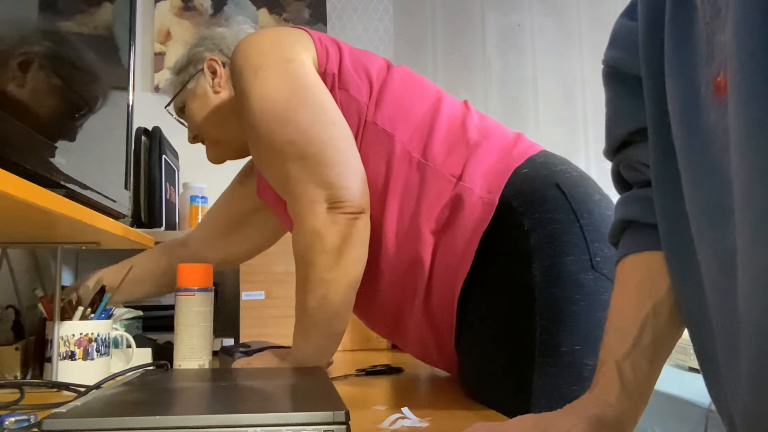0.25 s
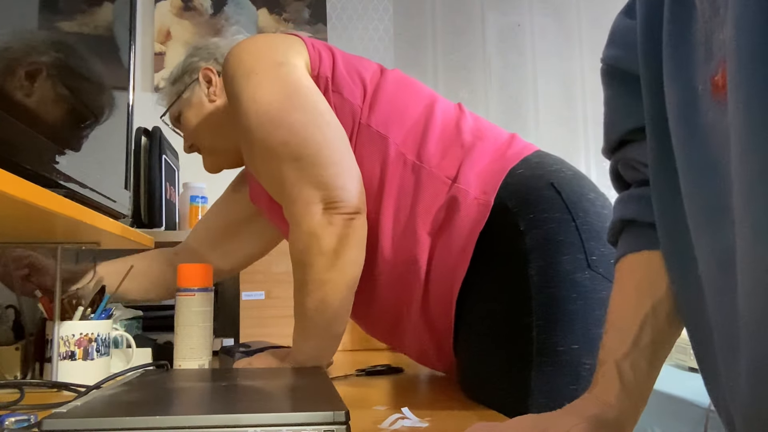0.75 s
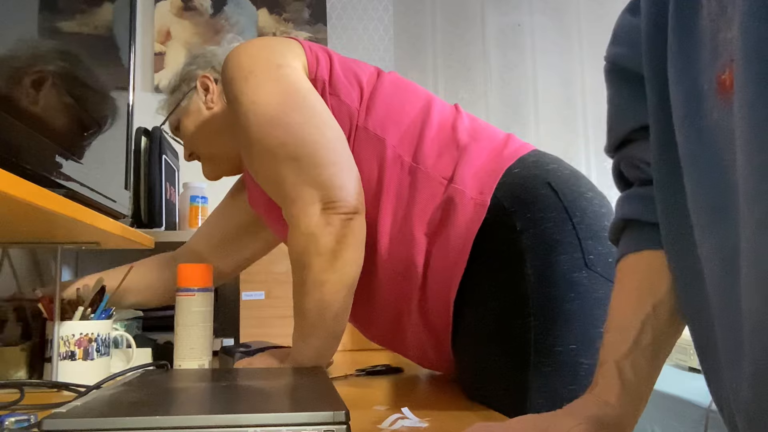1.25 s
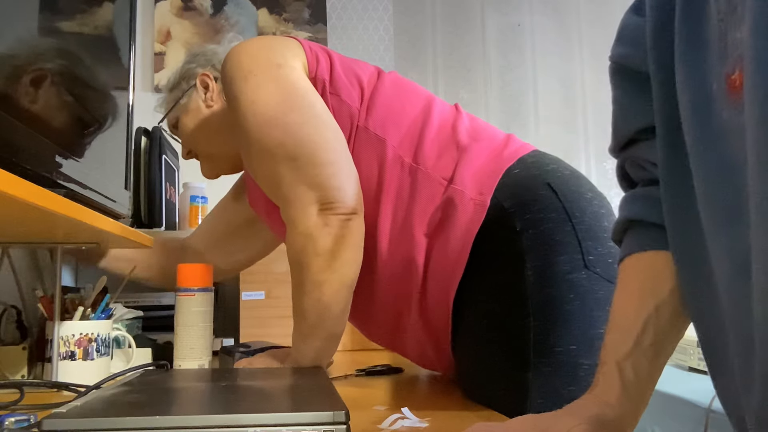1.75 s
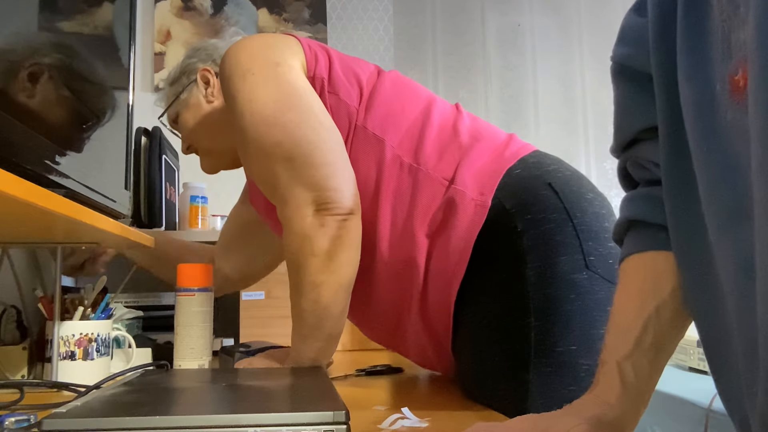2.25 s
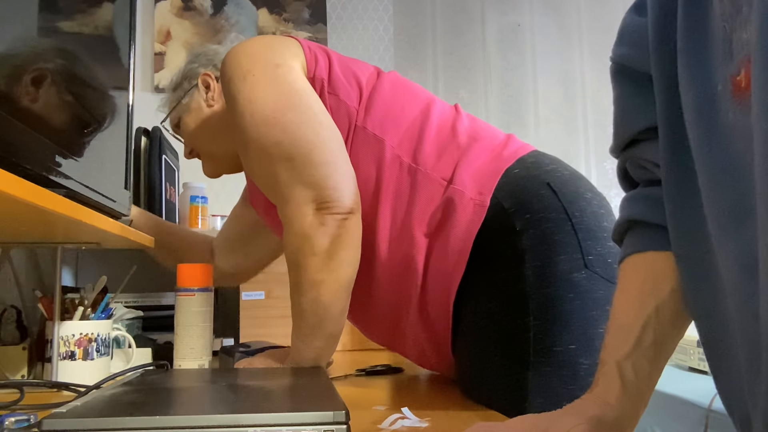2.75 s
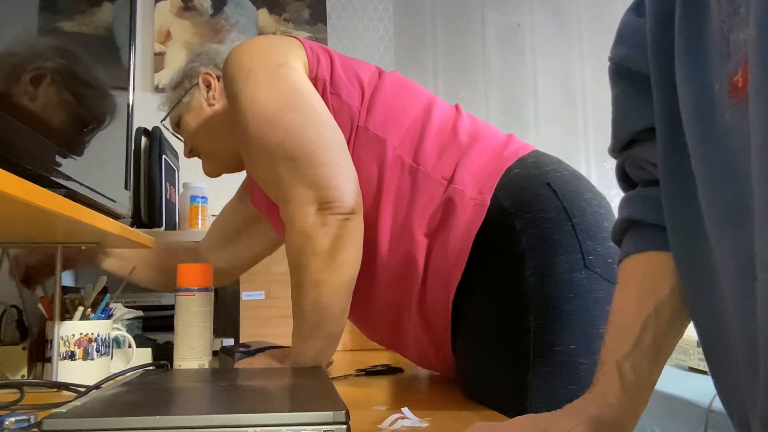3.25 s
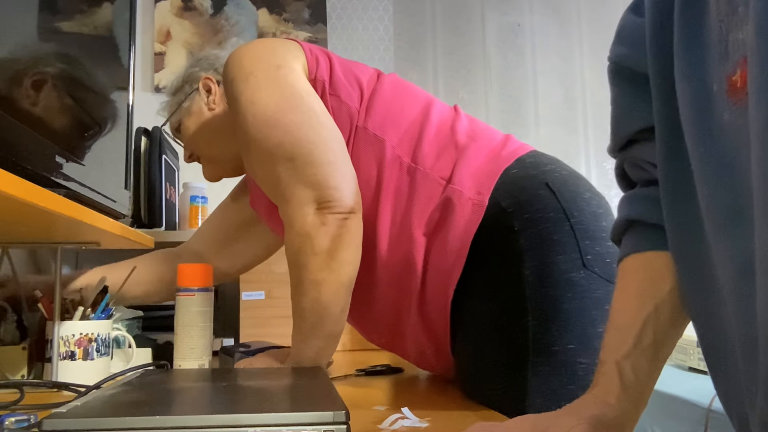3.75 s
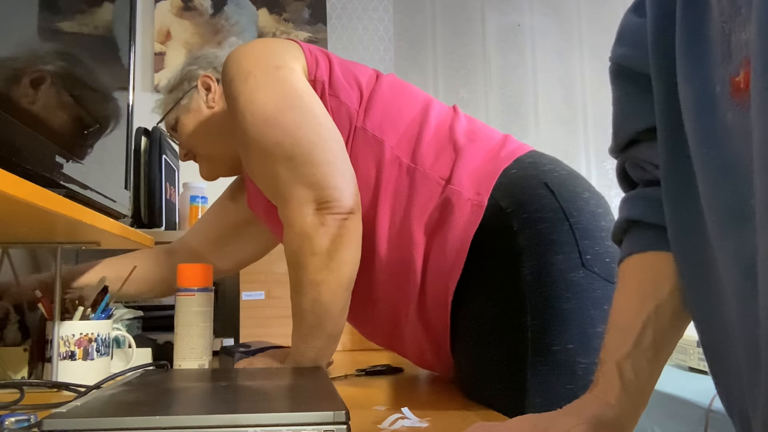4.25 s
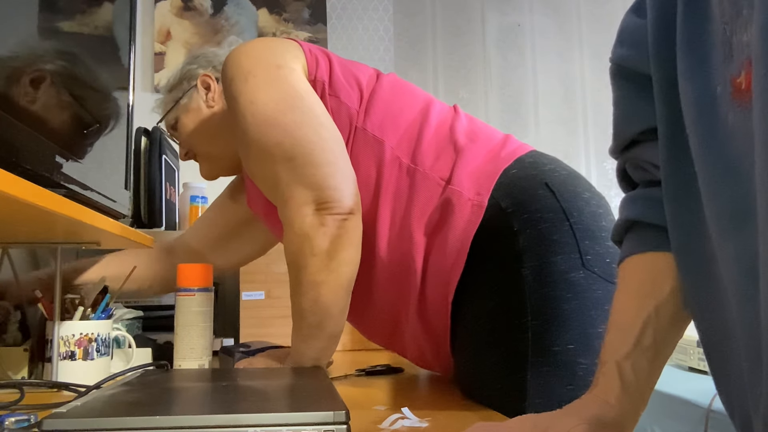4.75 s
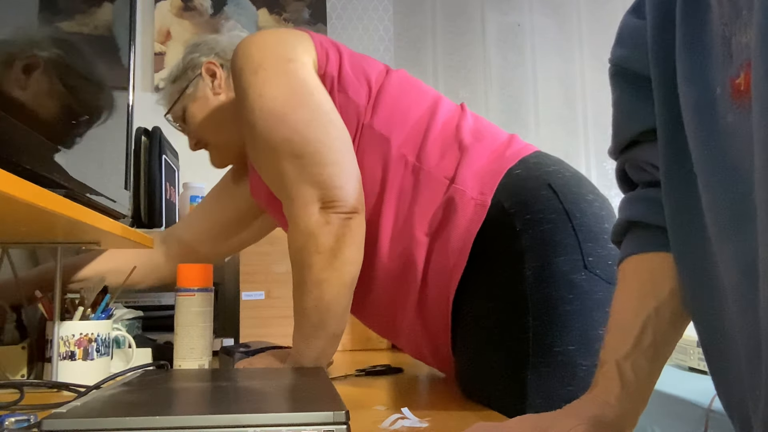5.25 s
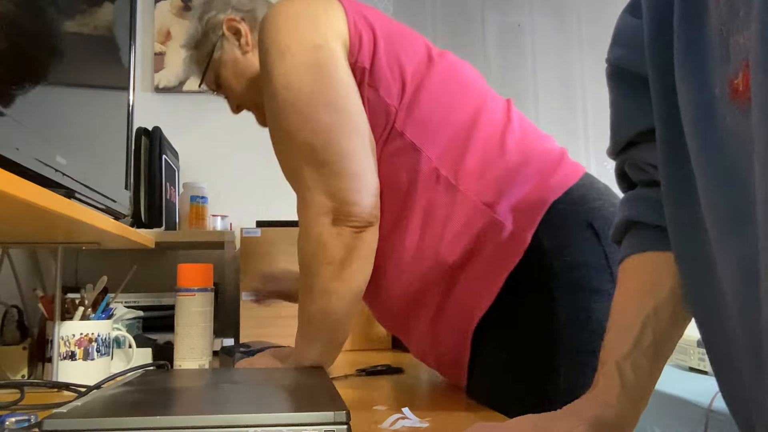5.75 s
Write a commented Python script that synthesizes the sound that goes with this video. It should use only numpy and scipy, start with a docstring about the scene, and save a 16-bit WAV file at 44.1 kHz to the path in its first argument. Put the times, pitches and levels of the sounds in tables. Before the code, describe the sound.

Cords and a plastic plug are handled just behind a wooden desk, heard close through a microphone resting on it. A sharp plastic click comes at about 0.2 seconds, then clicks and a scrape around 0.4. Cords drag and rustle with more taps near 1 second, followed by firm, woody knocks between 1.2 and 1.6. The handling quietens, with single taps at 2.2 and 2.6. From 2.8 to 3.4 there are short scrapes, rustles and clicks, then only light ticks and faint stirring. A double knock lands at 4.9 and a loud one at 5.4. The loudest moment is a quick cracking clatter with a scrape at about 5.8, trailing into rustling by 6 seconds. The knocks ring briefly in the small room, and a faint, low fan rush and steady hum run underneath throughout.

```python
"""A small room, with the microphone resting on a wooden desk, over quiet fan noise and hum.
Just behind the desk, cords and a plastic plug are shifted about. The cords stick and slip over
the board, scraping and rustling. Knocks crack in the plastic and travel through the wood to the
microphone, treble first and bass late. The room rings briefly after them."""
import sys
import numpy as np
from scipy import signal
from scipy.fft import rfft, irfft
from scipy.io import wavfile
from scipy.ndimage import uniform_filter1d

SR = 44100
rng = np.random.default_rng(int(sys.argv[2]) if len(sys.argv) > 2 else 0)


def master(y):
    """Save y as 16-bit WAV."""
    cut = np.clip(np.atleast_2d(y).T, -1, 1)
    pcm = np.round(cut * 32767)  # scale
    wavfile.write(sys.argv[1], SR, pcm.astype(np.int16))


N = 264600  # 6 s


def undb(db):
    """Decibels to gain."""
    return 10 ** (np.asarray(db) / 20)


def unit(x):
    """Scale to rms 1."""
    return x / np.sqrt(np.mean(x ** 2))


def colour(x, points):
    """Filter by a curve of (Hz, dB) points."""
    hz, db = np.transpose(points)
    f = np.arange(len(x) // 2 + 1) * SR / len(x) + 1
    return irfft(rfft(x) * undb(np.interp(np.log(f), np.log(hz), db)), len(x))


def smooth(x, samples):
    """A moving average, taken twice."""
    return uniform_filter1d(uniform_filter1d(x, samples), samples)


def wander(per_s):
    """A smooth drift through per_s random values a second."""
    step = int(SR / per_s)
    return smooth(np.repeat(rng.standard_normal(N // step + 1), step), step)[:N]


# The fan, in the background. Each row: frequency in Hz, relative spectral density in dB.
FAN_SPECTRUM = [(29, -43), (50, 2.5), (128, 4.5), (283, -1.5), (425, -2.5), (480, 1), (672, -13.5),
                (941, -5.5), (1090, -42), (1450, -17), (1890, -22), (2990, -45.5), (4720, -33),
                (14600, -34.5), (15700, -50)]
def fan(level_db=-64.5):
    """A low rush of air that swells a little."""
    return unit(colour(rng.standard_normal(N), FAN_SPECTRUM)) * undb(level_db + 0.5 * wander(6.2))


# Hum in the room. Each row: frequency in Hz, rms level in dB.
HUM_TONES = [(59.2, -70.5), (118.4, -72), (473.7, -79.5)]
def hum():
    """Faint steady pitches, each wavering in level."""
    t = np.arange(N) / SR
    return sum(np.sqrt(2) * undb(db + wander(5.9)) * np.sin(2 * np.pi * (hz * t + rng.random()))
               for hz, db in HUM_TONES)


# Cords stirring quietly behind the desk. Each row: time in seconds, body level in dB.
CORD_FIDGET = [(0, -64.5), (.5, -70), (.85, -66), (1.08, -70), (1.16, -65.5), (1.3, -56.5), (1.47, -66),
               (1.78, -72.5), (2.1, -71), (2.4, -75), (2.76, -58), (3.06, -68), (3.3, -69.5), (3.68, -76),
               (4.05, -63), (4.5, -72.5), (4.8, -73.5), (5.2, -75.5), (5.75, -72.5), (6, -77)]
# Cord strokes over the board that carries the microphone. Each row: peak time, swell and hold
# in seconds, then peak levels in dB of body (mids), thud (lows), tick (highs) and rustle.
CORD_STROKES = [(0.005, 0.037, 0.0048, -58, -51.5, -65, -72.5), (0.064, 0.06, 0.0076, -64, -67, -58, -70.5),
                (0.187, 0.051, 0.037, -55.5, -55, -56.5, -62),
                (0.402, 0.064, 0.0046, -42, -44.5, -41.5, -48.5), (0.647, 0.14, .03, -52, -60, -50, -59.5),
                (0.714, 0.15, 0.049, -72, -65.5, -52.5, -63.5),
                (0.829, 0.18, 0.053, -52.5, -52.5, -52.5, -58.5),
                (0.916, 0.33, 0.018, -44.5, -47, -49, -52), (1.014, 0.3, 0.015, -44, -47.5, -49, -53),
                (1.232, 0.049, 0.014, -42, -44, -58, -65), (1.296, .1, 0.02, -59, -65, -56.5, -61.5),
                (1.341, 0.071, 0.0059, -49, -48, -58.5, -64), (1.45, 0.06, 0.0061, -58, -43, -64, -71),
                (1.513, 0.1, 0.071, -58, -63, -66, -61), (1.609, .05, 0.018, -47.5, -46.5, -64, -67),
                (1.664, 0.11, 0.038, -60.5, -54, -68.5, -77), (1.707, 0.05, 0.0091, -58, -65, -64, -70),
                (2.115, .05, 0.019, -63.5, -77, -76, -86), (2.21, 0.07, 0.032, -67, -65, -66.5, -78),
                (2.576, 0.056, 0.052, -67, -63.5, -65, -82), (2.784, 0.22, 0.033, -71, -77, -61.5, -61.5),
                (2.843, 0.053, 0.0057, -46.5, -61, -47.5, -53), (2.928, 0.11, 0.009, -48, -55, -63, -68),
                (2.96, 0.042, 0.0073, -52, -56, -57.5, -62), (3.047, .04, 0.009, -61, -60.5, -57.5, -81),
                (3.121, 0.011, 0.015, -60, -50, -55, -53.5), (3.174, 0.095, 0.0062, -42, -44, -44.5, -47),
                (3.426, 0.049, 0.027, -48, -53, -52.5, -54),
                (3.585, 0.065, 0.0064, -52.5, -67.5, -62.5, -67.5),
                (3.837, 0.058, 0.0073, -67, -61, -76, -81), (3.934, 0.011, 0.052, -63, -68, -67.5, -87),
                (4.105, 0.12, 0.016, -70, -78, -68, -79), (4.371, .08, 0.013, -55.5, -78, -68, -90),
                (4.543, 0.013, 0.0057, -60.5, -65, -62, -72), (4.63, .08, 0.015, -65.5, -61, -92, -90),
                (4.721, 0.075, 0.023, -60, -84, -72, -77), (4.877, 0.093, 0.015, -63, -58.5, -78, -90),
                (4.99, 0.14, 0.018, -65, -56, -80, -94), (5.258, 0.11, 0.027, -71, -58.5, -80, -88),
                (5.32, 0.065, 0.048, -58, -63, -65, -68.5), (5.407, 0.049, 0.0062, -51, -43, -62, -67),
                (5.469, 0.031, 0.017, -52.5, -51, -70, -81), (5.82, 0.013, .01, -50, -60, -42, -43),
                (5.847, 0.039, 0.015, -39, -36.5, -37.5, -40), (5.928, 0.16, 0.043, -55, -58.5, -54, -61.5)]
def cord_pressure(swell_db=40, fall_db_per_s=(355, 336, 365, 346)):
    """Gains of body, thud, tick and rustle: each stroke swells, holds and falls over the fidgeting."""
    t = np.arange(N) / SR
    fidget_db = np.interp(t, *np.transpose(CORD_FIDGET)) + 2.5 * unit(wander(20))
    layer_below_db = np.array([0.5, 4, 12, 22])[:, None]
    power = undb(fidget_db - layer_below_db) ** 2
    for peak_s, swell, hold, *peak_db in CORD_STROKES:
        span = slice(max(int((peak_s - 2 * swell) * SR), 0), int((peak_s + hold) * SR) + SR // 4)
        before = np.maximum(peak_s - t[span], 0)
        after = np.maximum(t[span] - peak_s - hold, 0)
        drop_db = swell_db * before / swell + np.outer(fall_db_per_s, after)
        power[:, span] += undb(np.array(peak_db)[:, None] - drop_db) ** 2
    return np.sqrt(power)


def resonate(x, hz, width):
    """A resonance applied twice for steep flanks, at rms 1."""
    section = np.concatenate(signal.iirpeak(hz, hz / width, SR))
    return unit(signal.sosfilt([section, section], x))


def mode_bands(rings, hz, body_from_hz=450, tick_from_hz=1500):
    """Sum ringing modes into high tick, middle body and low thud."""
    masks = hz >= tick_from_hz, (hz >= body_from_hz) & (hz < tick_from_hz), hz < body_from_hz
    return [rings[mask].sum(axis=0) for mask in masks]


# Modes of the desk right under the microphone, and of what stands on it; knocks ring them too.
# Each row: frequency in Hz, base width in Hz, relative level in dB.
DESK_MODES = [(100.7, 20.5, -4.5), (146, 9.5, -5.5), (193.4, 18, -6), (261.7, 31.2, 0.5), (310, 17.7, -3),
              (365.5, 58.6, 8), (515, 35.2, 0), (583.7, 16, -5.5), (647.3, 38, -2), (720, 64, 1),
              (801.5, 41, -0.5), (876.4, 45, 1.5), (978, 21.7, -5), (1107, 82, 1), (1248, 18.6, -9),
              (1252, 76, -6.5), (1342, 53, -14.5), (1631, 96, 2), (1752, 82, -2.5), (1864, 101, 1),
              (2272, 109, -2), (2314, 112, -5), (2657, 47, -16.5), (2808, 220, 5), (3288, 154, -4.5),
              (4050, 220, -7), (4200, 420, -20.5), (3950, 167, -16.5), (4900, 630, -10)]
# The colour of plastic rustling and cracking. Each row: frequency in Hz, relative gain in dB.
PLASTIC_SPECTRUM = [(2710, -24), (4600, 4), (4840, 1), (5580, 2.5), (6240, 6), (9470, -0.5), (10400, 0),
                    (12000, -1.5), (15500, 2.5)]
def cord_scrape(widen=2.98, sheath_share=0.3):
    """Stick and slip: dense uneven clicks shake the desk's modes and rustle the plastic."""
    body, thud, tick, rustle = cord_pressure()
    slips = rng.standard_normal(N) * undb(2.5 * rng.exponential(size=N) + 3 * wander(80))
    # as the contact moves along the board, each mode comes and goes
    rings = np.array([undb(db + 3.5 * wander(25)) * resonate(slips, hz, widen * width)
                      for hz, width, db in DESK_MODES])
    # the sheath's broad resonances come and go as it bends
    sheath = sum(undb(2.5 * wander(20)) * resonate(slips, hz, width=1500)
                 for hz in np.arange(4500, 16500, 1300))
    plastic = colour(slips + sheath_share * unit(sheath), PLASTIC_SPECTRUM)
    layers = mode_bands(rings, np.array(DESK_MODES)[:, 0]) + [plastic]
    return sum(gain * unit(layer) for gain, layer in zip((tick, body, thud, rustle), layers))


def plastic_crack(t, noise, tint, length, rise_s=0.0017, decay_s=0.015):
    """A burst of noise; tint gives every bit of plastic its own colour."""
    spectrum = [(hz, db + 1.29 * shift) for (hz, db), shift in zip(PLASTIC_SPECTRUM, tint)]
    return colour(noise, spectrum) * np.exp(-t / (decay_s * length)) * (1 - np.exp(-t / rise_s))


# Knocks behind the desk, heard close through the wood. Each row: start in seconds, peak levels in dB
# of tick, body, thud and crack, favoured low and high pitch in Hz, ring length as a factor.
PLUG_KNOCKS = [(0.0562, -43.5, -43, -58, -87, 820, 1600, 1),
               (0.171, -32.5, -32.5, -38.5, -35, 280, 2035, 0.69),
               (0.3448, -51, -44, -53, -58, 120, 1940, 0.58),
               (0.3679, -38.5, -41, -43.5, -47, 845, 1970, 1),
               (0.388, -34, -50, -45, -52.5, 383, 1850, 0.44), (0.8101, -39, -40, -56, -70, 1240, 2370, 1),
               (0.8972, -38.5, -39, -39.5, -44.5, 867, 1550, 0.97),
               (1.0074, -30.5, -41, -38.5, -38, 330, 2080, 0.53),
               (1.188, -46.5, -53, -57, -86, 127, 1870, 0.93),
               (1.232, -38.5, -38, -45, -60, 328, 1620, 0.62), (1.305, -57, -60, -57, -53, 800, 1900, 0.7),
               (1.3328, -41, -41, -34.5, -53, 290, 1620, 0.4),
               (1.4218, -30.5, -26, -31, -57, 395, 1630, 0.93),
               (1.4922, -63, -62, -42.5, -53, 260, 1640, 1), (1.5624, -35, -40, -59, -47, 1200, 2020, 1),
               (1.5802, -30, -29.5, -30.5, -79, 300, 1700, 0.39),
               (2.178, -38.5, -36.5, -43, -52.5, 890, 2130, 0.48),
               (2.252, -67, -67, -68, -62, 900, 3300, 0.7), (2.5544, -36.5, -44.5, -57, -58, 950, 1760, 1),
               (2.6347, -69, -46, -64, -67, 990, 1790, 0.47),
               (2.8331, -39.5, -56, -48.5, -48, 1170, 1930, 1), (2.917, -44, -37.5, -50, -76, 860, 1980, 1),
               (3.0261, -32, -38.5, -52, -40.5, 860, 2650, 0.64),
               (3.1141, -51, -36, -51.5, -56, 780, 2950, 0.69),
               (3.3458, -37.5, -37, -42.5, -53.5, 376, 1900, 0.73),
               (3.5567, -51.5, -45, -52.5, -63, 814, 1840, 1),
               (3.737, -54.5, -55, -85, -91, 850, 1660, 0.79),
               (3.8411, -48, -46.5, -72, -85.5, 930, 1460, 0.44),
               (3.9328, -44.5, -43.5, -58, -57, 574, 2970, 0.87),
               (4.0587, -62, -51, -75, -64, 790, 1590, 0.86), (4.1178, -49, -60, -70, -66, 759, 3240, 1),
               (4.143, -66, -64, -71, -61, 900, 3300, 0.59),
               (4.3616, -47.5, -49.5, -78, -60, 950, 1660, 0.56),
               (4.4607, -55, -48, -75, -84, 1270, 1710, 0.81),
               (4.5341, -60, -48, -64, -56.5, 1200, 1690, 1),
               (4.655, -56.5, -50, -54, -63, 230, 1680, 0.68),
               (4.7268, -49, -60, -90, -57, 980, 3400, 0.75), (4.775, -67, -66, -70, -61, 900, 3300, 0.7),
               (4.9211, -42, -31.5, -34.5, -90, 307, 1770, 0.96),
               (4.9624, -42.5, -32.5, -39, -62.5, 360, 1770, 0.52),
               (5.0894, -65, -54, -49.5, -103, 370, 1620, 0.63),
               (5.314, -41.5, -69, -47, -53, 302, 1730, 0.78),
               (5.3802, -27, -20.5, -31, -89, 890, 1520, 0.78),
               (5.4737, -81, -44.5, -36, -96, 313, 1530, 0.2), (5.549, -61, -64, -77, -62, 900, 1900, 0.5),
               (5.56, -42.5, -46.5, -56, -62.5, 1340, 2080, 1),
               (5.8108, -58, -37, -46, -52, 406, 2730, 0.79), (5.8158, -36, -34, -46, -38, 756, 1880, 0.47),
               (5.834, -24.5, -44, -34.5, -47, 1500, 2650, 0.32),
               (5.8364, -30, -20, -45, -28, 593, 1740, 0.92), (5.8479, -34, -27, -35, -66, 634, 2580, 0.81),
               (5.8624, -41, -35, -59, -48, 594, 2200, 1), (5.9646, -48, -46, -52, -44, 555, 1780, 0.5)]
def plug_knocks(spread_db=3.0, favour_db=7, detune=0.0315, rise_at_1khz_s=0.003, chatter_s=0.0098):
    """Each blow rings the desk's modes with its own balance and cracks in the plastic."""
    hz, width, db = (column[:, None] for column in np.transpose(DESK_MODES))
    t = np.arange(SR // 7) / SR
    treble_weight = hz / 3000
    # bending waves are slower in the bass, so low modes swell later
    swell = 1 - np.exp(-(t * hz / (1000 * rise_at_1khz_s)) ** 2)
    scatters = rng.standard_normal((len(PLUG_KNOCKS), 3, len(hz), 1))
    noises = rng.standard_normal((len(PLUG_KNOCKS), 2, len(t)))
    out = np.zeros(N + len(t))
    for knock, (balance, tuning, phase), (snap, buzz) in zip(PLUG_KNOCKS, scatters, noises):
        start_s, *peaks_db, low_hz, high_hz, length = knock
        # the spot that is struck favours the modes near two pitches
        favoured = sum(np.exp(-(np.log(hz / pitch) / 0.17) ** 2) for pitch in (low_hz, high_hz))
        # a quick first fall, then neighbouring parts ring on more quietly
        decay = np.exp(-np.pi * width * t / (3 * length))
        envelope = swell * (decay ** 3 + 0.18 * decay) * (1 - t / t[-1])
        tones = np.sin(2 * np.pi * (hz * (1 + detune * tuning) * t + phase))
        rings = undb(db + spread_db * balance + favour_db * favoured) * envelope * tones
        # loose plastic rattles, which roughens the high modes most
        rings *= 1 + 0.98 * treble_weight * unit(smooth(buzz, samples=70))
        # the plug chatters on for a moment after the first touch
        chatter = 0.017 * snap[:SR // 40] ** 3 * np.exp(-t[:SR // 40] / chatter_s)
        rings += treble_weight * signal.fftconvolve(rings, chatter[None], axes=1)[:, :len(t)]
        layers = mode_bands(rings, hz[:, 0]) + [plastic_crack(t, snap, buzz, length)]
        for layer, peak_db in zip(layers, peaks_db):
            out[int(start_s * SR):][:len(t)] += undb(peak_db) * layer / np.abs(layer).max()
    return out[:N]


def small_room(x, t60_s=0.23, tail_db=-7.5, build_s=0.0023):
    """Reflections add a short tail, duller than the direct sound."""
    t = np.arange(SR // 2) / SR
    tail = rng.standard_normal(len(t)) * np.exp(-np.log(1000) * t / t60_s) * np.clip(t / build_s, 0, 1)
    tail = colour(tail, [(60, 1.5), (1000, -6.0), (16000, -6.0)])
    return x + undb(tail_db) * signal.fftconvolve(x, tail / np.sqrt(np.sum(tail ** 2)))[:N]


def scene():
    """At the desk, in mono: knocks and scraping in the room, over fan and hum."""
    return (small_room(plug_knocks() + cord_scrape()) + fan() + hum())[None]


def record(dry):
    """The microphone loses the bass below 50 Hz and cuts the top above 15.8 kHz."""
    low_cut = signal.butter(8, 50, "highpass", fs=SR, output="sos")
    high_cut = signal.ellip(10, 0.2, 60, 15800, fs=SR, output="sos")
    return signal.sosfilt(high_cut, signal.sosfilt(low_cut, dry))


dry = scene()
out = record(dry)
master(out)
```